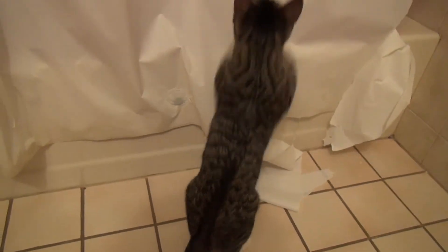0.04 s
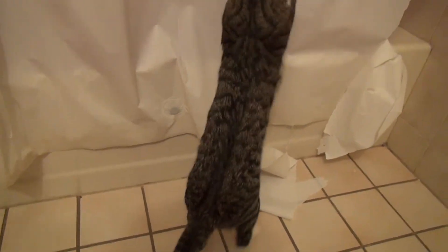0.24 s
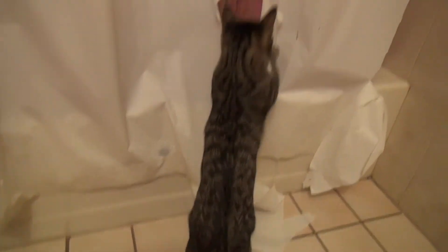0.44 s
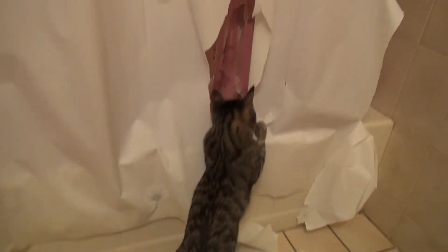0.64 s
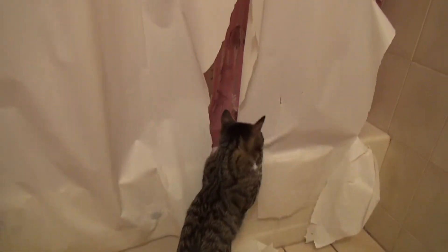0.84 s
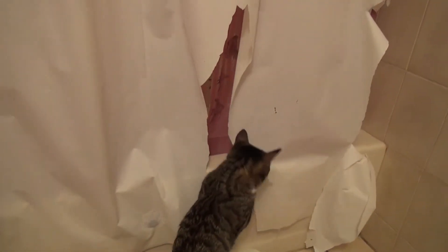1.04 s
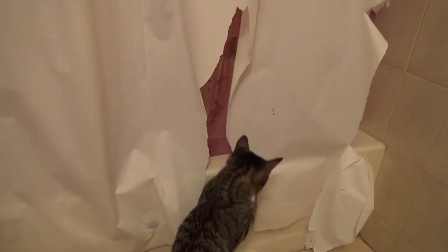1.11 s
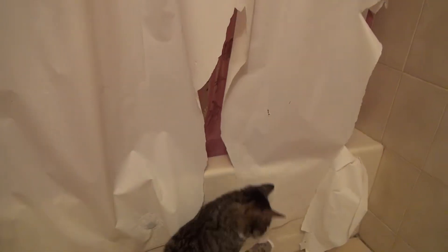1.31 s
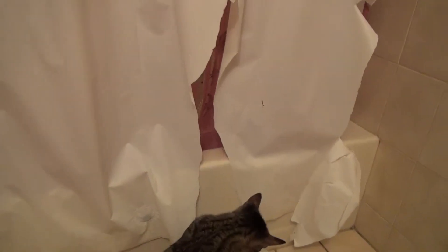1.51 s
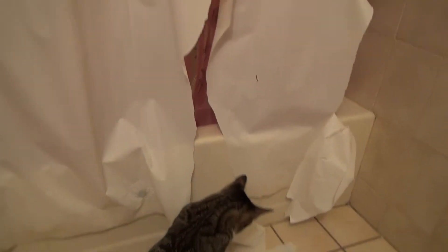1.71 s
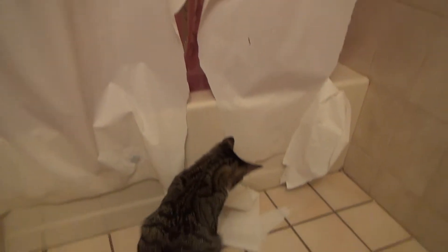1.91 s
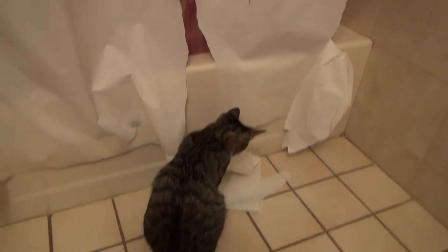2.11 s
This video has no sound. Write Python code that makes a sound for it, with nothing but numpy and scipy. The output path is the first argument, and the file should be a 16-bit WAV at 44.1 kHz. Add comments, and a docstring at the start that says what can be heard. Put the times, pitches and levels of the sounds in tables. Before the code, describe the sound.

Thin plastic tears and crumples in a burst of tiny snaps as a cat drags down a shower curtain. A low thud and quiet crinkles follow, louder on the right, with tiled bathroom echo and a faint fan hum.

```python
"""A fan hums in a small tiled bathroom, with a faint, thin whine above it. A cat rears up, slaps a
plastic shower curtain and drags its claws down through it: for half a second the film rips in a spray
of tiny snaps while the sheet crumples. The cat drops back against the tub with a dull boom, then noses
the loose plastic in soft rustles, ending on one last flap and snap. The tiles ring after every move,
and the whole scene sits louder on the right."""
import sys
import numpy as np
from scipy import signal
from scipy.fft import rfft, irfft
from scipy.io import wavfile

SR = 44100
rng = np.random.default_rng(int(sys.argv[2]) if len(sys.argv) > 2 else 0)


def dump(signal):
    """Clip the signal to [-1, 1] and save it as 16-bit WAV at the path in sys.argv[1]."""
    limited = np.clip(np.atleast_2d(signal).T, -1, 1)
    pcm = np.round(limited * 32767).astype(np.int16)
    wavfile.write(sys.argv[1], SR, pcm)


N = 94815
T = np.arange(N) / SR
FFT_SIZE = 2 ** 17
FREQS = np.fft.rfftfreq(FFT_SIZE, 1 / SR)

# The claws' downward pull. Each row: time in seconds, then rip, crumple and rasp levels in dB.
PULL_LEVELS = [(0.188, -47, -57, -61), (0.202, -57, -36, -29.5), (0.219, -42, -32, -34),
               (0.224, -24.5, -26, -37), (0.243, -24, -23.5, -32.5), (0.269, -19, -24.5, -29),
               (.30, -19, -28.5, -24), (0.336, -19, -26, -28), (.37, -28.5, -26.5, -31),
               (.42, -27.5, -33.5, -25.5), (.46, -28.5, -30, -28), (.495, -27.5, -31, -26),
               (0.541, -22.5, -25.5, -28.5), (.565, -35.5, -29, -30.5), (.592, -34, -32.5, -34),
               (0.623, -23, -29.5, -36), (.66, -48.5, -37, -39), (.70, -45, -45, -59),
               (.78, -57.5, -59, -61.5)]
# Bright tone of the ripping film. Each row: frequency in Hz, level in dB.
RIP_EQ = [(100, -42), (500, -14), (1500, -7.5), (3000, 3), (4500, 0), (6500, 3), (9000, 0), (11000, 1),
          (13000, -4), (16000, -8.5)]
# Duller tone of the crumpling sheet. Each row: frequency in Hz, level in dB.
CRUMPLE_EQ = [(30, -16), (80, -19), (200, -4.5), (380, -7.5), (560, 0), (750, 1), (1000, -1.5), (1350, 0.5),
              (2000, -1), (2900, -6), (3600, -4.5), (5000, -9.5), (9000, -17.5), (16000, -37)]
# Midrange bite of claws on taut film. Each row: frequency in Hz, level in dB.
RASP_EQ = [(100, -39), (900, -15.5), (1250, -3.5), (1600, -2), (1850, -7), (2100, -1), (2450, -1.5),
           (2900, -8), (4000, -11), (8000, -23.5), (16000, -40)]
# Single sharp snaps. Each row: start in seconds, level in dB, pitch in Hz, decay in seconds.
SNAP_CUES = [(0.2632, -8.5, 5100, .0004), (0.2686, -11, 12900, .0004), (0.293, -5, 8400, 0.000076),
             (0.3024, -6.5, 6070, .0004), (0.348, -13, 7250, 0.00024), (0.4666, -10, 6390, 0.0011),
             (.5383, -19, 6060, 0.00013), (1.098, -46, 8000, .0003), (1.778, -33.5, 10000, .0005),
             (1.7795, -31, 13200, 0.00044), (1.848, -42, 8450, .0004), (2.1398, -27, 7940, 0.001),
             (2.1388, -35, 2080, 0.0011)]
# Hits on the curtain. Each row: start in seconds, flap and scuff levels in dB, scuff decay in seconds.
SLAP_CUES = [(.1632, -47, -34.5, 0.016), (.2018, -12.5, -24.5, 0.014), (0.2166, -18.5, -20.5, 0.0074),
             (.999, -62, -47, .005), (1.341, -57, -46.5, 0.0044), (2.137, -36, -38.5, 0.0054)]
# The slack curtain's hollow flap. Each row: pitch in Hz, level in dB, seconds to fall by 60 dB.
CURTAIN_MODES = [(184, -13, 0.019), (275, -8, 0.017), (597, -10.5, 0.028), (767, 3, 0.014),
                 (1183, -3.5, 0.014), (2256, -12.5, 0.04), (2350, -19, 0.024)]
# Tone of a paw scuffing plastic. Each row: frequency in Hz, level in dB.
SCUFF_EQ = [(40, -29), (100, -9), (200, 11), (400, 1), (600, 13), (850, 6), (1200, 1), (2200, -12.5),
            (4000, -16), (8000, -14), (16000, -24)]
# Paws on tub and floor. Each row: start in seconds, level in dB, low-pass in Hz, attack in seconds.
THUMP_CUES = [(.164, -46, 200, 0.0027), (.262, -32, 60, 0.011), (.563, -29, 600, 0.0048),
              (0.638, -29, 74.5, .02), (1.401, -43, 128.5, 0.0074)]
# The tub's boom. Each row: pitch in Hz, level in dB, seconds to fall by 60 dB.
BOOM_MODES = [(73.8, -5.5, 0.45), (104, 9.5, 0.055), (148, 0, 0.094), (228.2, -7.5, 0.85),
              (306.4, 3.5, 0.12)]
# Nudges of loose plastic. Each row: peak time in seconds, body and top levels in dB, rise and fall
# in seconds.
RUSTLE_CUES = [(.166, -54, -48, 0.0093, .012), (.83, -51.5, -56.5, 0.09, 0.059),
               (1.0, -55.5, -61, 0.036, 0.038), (1.10, -55.5, -50.5, 0.02, 0.015),
               (1.161, -52.5, -44, 0.021, 0.036), (1.212, -37, -38, 0.02, 0.012),
               (1.30, -62, -66, .02, 0.022), (1.355, -54.5, -52, .018, 0.012),
               (1.416, -52.5, -50, 0.012, 0.013), (1.49, -53.5, -55, .03, 0.035),
               (1.61, -67, -66, 0.032, 0.024), (1.682, -51.5, -51.5, 0.038, 0.048),
               (1.79, -61.5, -54.5, 0.032, 0.038), (1.92, -60.5, -61.5, .03, 0.057),
               (1.994, -54.5, -54, 0.011, 0.017), (2.05, -45.5, -53, 0.0075, 0.0083),
               (2.064, -43, -72, 0.016, 0.0086), (2.1382, -38, -38.5, .001, 0.0044)]
# Body of a rustle. Each row: frequency in Hz, level in dB.
RUSTLE_BODY_EQ = [(100, -16.5), (500, -3), (1000, 0), (1900, 4.5), (3200, 1.5), (4500, -3.5), (6000, -3.5),
                  (8000, -1.5), (10000, -6), (16000, -12)]
# Crisp top of a rustle. Each row: frequency in Hz, level in dB.
RUSTLE_TOP_EQ = [(100, -32), (1500, -19), (4500, -5), (6000, -6.5), (8000, -2.5), (10000, -4.5),
                 (12500, -6.5), (16000, -18.5)]
# The fan's hum. Each row: pitch in Hz, level in dB.
HUM_TONES = [(58.5, -58.5), (203.5, -57), (297, -63), (405, -65.5)]
# The fan's low rush. Each row: frequency in Hz, level in dB.
RUSH_EQ = [(15, -61), (25, -15.5), (75, -3), (104, -1), (151, -5), (214, 0.5), (251, -1), (316, -2.5),
           (475, -1), (533, -7.5), (616, -5.5), (723, -9.5), (800, -7.5), (1040, -25), (1760, -120)]
# The bed of hiss. Each row: frequency in Hz, level in dB.
HISS_EQ = [(25, 4), (400, -0.5), (800, 5), (1400, -0.5), (3000, -5), (8000, -4.5), (16000, -8.5)]
# Reverb time of the tiled room. Each row: frequency in Hz, seconds to fall by 60 dB.
TILE_DECAY = [(60, 0.63), (250, 1), (1000, 0.49), (3000, 0.34), (8000, 0.39), (16000, 0.21)]
# The lean to the right. Each row: frequency in Hz, left level minus right level in dB.
LEFT_TILT = [(60, -7), (200, -6.5), (380, -6), (700, -8), (1300, -10), (2400, -9.5), (4400, -11.5),
             (6500, -4.5), (8500, -2), (11000, -7.5), (13500, -20), (16000, -8)]


def rip():
    """The film gives way as one paw's claws catch and slip: a fitful spray of bright snaps."""
    fits = undb(1.23 * wander(turns=220))
    spray = crackle(spread_db=3.5, count=3600) * pull_envelope("rip") * fits
    return colour(spray, RIP_EQ) / np.sqrt(2)  # each paw carries half the power


def crumple():
    """The pulled sheet buckles with duller crackles."""
    return colour(crackle(spread_db=3, count=9000) * pull_envelope("crumple"), CRUMPLE_EQ)


def rasp():
    """Claws scrape down the taut film: a tight midrange crackle."""
    return colour(crackle(spread_db=2.5, count=7000) * pull_envelope("rasp"), RASP_EQ)


def snaps():
    """Creases flip over, each with a very short ring."""
    clicks = 0
    for start, db, hz, decay in SNAP_CUES:
        age = np.maximum(T - start, 0)
        clicks = clicks + undb(db) * np.exp(-age / decay) * np.sin(2 * np.pi * hz * age)
    return clicks


def slaps(attack_s=0.0017):
    """Paws strike the slack curtain: a hollow flap and a brief scuff."""
    flap = contact = 0
    for start, flap_db, scuff_db, decay in SLAP_CUES:
        flap = flap + undb(flap_db) * ring(CURTAIN_MODES, start, attack_s)
        attack = np.clip((T - start) / attack_s + 0.5, 0, 1)
        release = np.exp(-np.maximum(T - start - attack_s / 2, 0) / decay)
        contact = contact + undb(scuff_db) * attack * release
    return flap + colour(rng.standard_normal(N) * contact, SCUFF_EQ)


def thumps(low_cut_hz=66):
    """Paws push off and land; the tub booms, duller for a softer step."""
    boom = 0
    for start, db, cutoff_hz, attack_s in THUMP_CUES:
        soft_pad = signal.butter(2, cutoff_hz, fs=SR, output="sos")
        boom = boom + undb(db) * signal.sosfilt(soft_pad, ring(BOOM_MODES, start, attack_s))
    return signal.sosfilt(signal.butter(2, low_cut_hz, "high", fs=SR, output="sos"), boom)


def rustles():
    """Loose plastic is nudged; each crinkle swells and fades, some crisper than others."""
    body_gain = top_gain = 0
    for peak, body_db, top_db, rise, fall in RUSTLE_CUES:
        swell = np.exp(-np.maximum((peak - T) / rise, (T - peak) / fall))
        body_gain = body_gain + undb(body_db) * swell
        top_gain = top_gain + undb(top_db) * swell
    body = colour(crackle(spread_db=1, count=15000) * body_gain, RUSTLE_BODY_EQ)
    top = colour(crackle(spread_db=1, count=7000) * top_gain, RUSTLE_TOP_EQ)
    return body + top


def fan(rush_db=-56, hiss_db=-61.5):
    """A fan's wavering hum and low rush come up slightly over a faint, steady hiss."""
    hum = 0
    for hz, db in HUM_TONES:
        waver = 1 + 0.085 * wander(turns=18)
        phase = 2 * np.pi * hz * T + 0.89 * wander(turns=14)
        hum = hum + undb(db) * np.sqrt(2) * waver * np.sin(phase)
    rush = undb(rush_db) * colour(diffuse_noise(), RUSH_EQ)
    hiss = undb(hiss_db) * colour(diffuse_noise(), HISS_EQ)
    swell = undb(np.interp(T, [0.15, 0.9], [-2, 0]))
    return (hum + rush) * swell + hiss


def whine(hz=3500, start_db=-72.5, drop_db=3, drop_s=0.28):
    """A faint, thin whine that soon settles lower in the hiss."""
    gain = undb(start_db - drop_db * np.clip(T / drop_s, 0, 1) ** 2)
    return gain * np.sin(2 * np.pi * hz * T + wander(turns=120))


def bathroom(first_echo_s=0.00225):
    """Echoes die away between the tiles: a band shape and a fade for each octave."""
    centres = 62.5 * 2 ** np.arange(9)
    octaves = []
    for hz, solo in zip(centres, np.eye(len(centres))):
        band = over_hz(list(zip(centres, solo)))
        fade = np.exp(-np.log(1000) * T / over_hz(TILE_DECAY, hz)) * (T > first_echo_s)
        octaves.append((band, fade / np.sqrt(np.sum(fade ** 2))))
    return octaves


def in_room(x, room, wet_db):
    """Direct sound plus reverb at the same total power; each spot in the room has its own echoes."""
    echoes = rfft(diffuse_noise(), FFT_SIZE)
    tail = sum(irfft(echoes * band)[:, :N] * fade for band, fade in room)
    response = 1 + undb(wet_db) * rfft(tail, FFT_SIZE)
    return irfft(rfft(x, FFT_SIZE) * response)[:, :N] / np.hypot(1, undb(wet_db))


def pull_envelope(layer):
    """Fader ride for one layer as the claws drag down, silent before and after."""
    times, *levels = np.array(PULL_LEVELS).T
    db = levels[("rip", "crumple", "rasp").index(layer)]
    return undb(np.interp(T, times, db, left=-np.inf, right=-np.inf))


def crackle(spread_db, count, decay_s=0.0001):
    """Tiny snaps at random moments, each with its own pitch and size, a few standing out."""
    when, pitch, chance, phase = rng.random((count, 4)).T
    taps = np.arange(64)
    size = undb(spread_db * np.minimum(-np.log(chance), 3.5))  # the cap reins in the largest snaps
    cycles = pitch[:, None] * taps / 2 + phase[:, None]
    grains = size[:, None] * np.exp(-taps / SR / decay_s) * np.cos(2 * np.pi * cycles)
    positions = (when * N).astype(int)[:, None] + taps
    return unit_rms(np.bincount(positions.ravel(), grains.ravel(), minlength=N)[:N])


def ring(modes, start, attack_s):
    """Damped resonances set off by one contact."""
    age = np.maximum(T - start, 0)
    partials = sum(undb(db) * np.exp(-np.log(1000) * age / t60) * np.sin(2 * np.pi * hz * age)
                   for hz, db, t60 in modes)
    return np.minimum(age / attack_s, 1) * partials


def diffuse_noise(wide_above_hz=6940):
    """Stereo noise, centred in the bass and wide in the treble."""
    mid, side = rfft(rng.standard_normal((2, N)), FFT_SIZE)
    alike = 1 / (1 + (FREQS / wide_above_hz) ** 2)
    mid *= np.sqrt((1 + alike) / 2)
    side *= np.sqrt((1 - alike) / 2)
    return irfft([mid + side, mid - side])[:, :N]


def wander(turns):
    """Smooth random drift through this many points over the scene."""
    return signal.resample(rng.standard_normal(turns), N)


def colour(x, eq):
    """Minimum-phase EQ, so nothing rings ahead of a hit; white noise keeps its power."""
    gain = unit_rms(undb(over_hz(eq)))
    cepstrum = irfft(np.log(gain))
    cepstrum[1:FFT_SIZE // 2] *= 2
    cepstrum[FFT_SIZE // 2 + 1:] = 0
    return irfft(rfft(x, FFT_SIZE) * np.exp(rfft(cepstrum)))[..., :N]


def over_hz(points, hz=FREQS):
    """Read a curve of (Hz, value) points on a log-frequency axis."""
    freqs, values = np.array(points, float).T
    return np.interp(np.log(np.maximum(hz, 1)), np.log(freqs), values)


def undb(db):
    """Decibels to gain."""
    return 10 ** (np.asarray(db) / 20)


def unit_rms(x):
    """Scale to an rms of 1."""
    return x / np.sqrt(np.mean(x ** 2))


def scene():
    """Two paws rip; cat and curtain ring in the same room, over the fan and the whine."""
    room = bathroom()
    # Each pair: layer, reverb against direct sound in dB.
    layers = [(rip(), 2), (rip(), 2), (crumple(), 1), (rasp(), 3),
              (rustles(), -2), (snaps(), -6), (slaps(), -1), (thumps(), -6)]
    return sum(in_room(x, room, wet_db) for x, wet_db in layers) + fan() + whine()


def record(dry, ceiling=0.75, top_hz=15850):
    """The left side is weaker and duller; the tallest peaks are rounded and the very top is cut."""
    left = undb(over_hz(LEFT_TILT))
    pan = np.array([left, np.ones_like(left)]) * 2 / (1 + left)
    panned = irfft(rfft(dry, FFT_SIZE) * pan)[:, :N]
    rounded = panned / (1 + (panned / ceiling) ** 6) ** (1 / 6)
    return signal.sosfilt(signal.ellip(10, 0.2, 80, top_hz, fs=SR, output="sos"), rounded)


dry = scene()
out = record(dry)
dump(out)
```